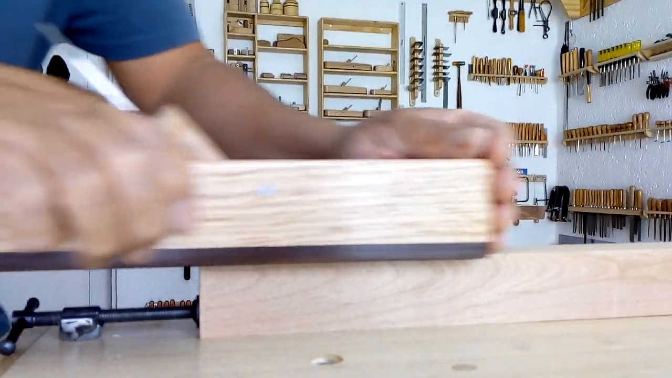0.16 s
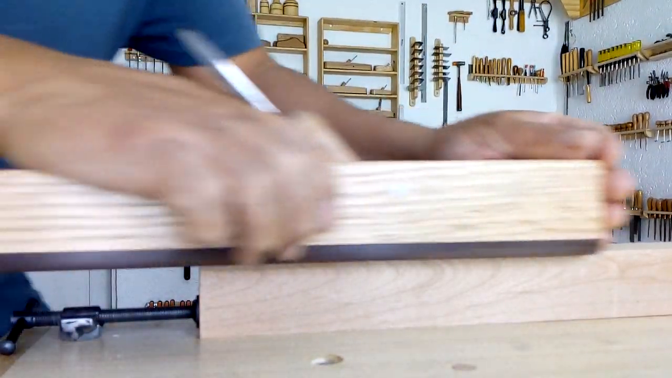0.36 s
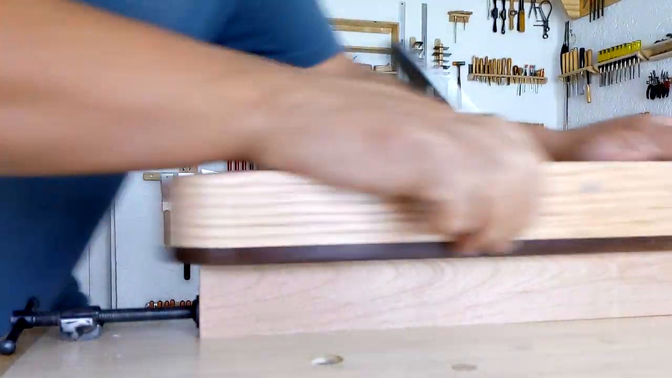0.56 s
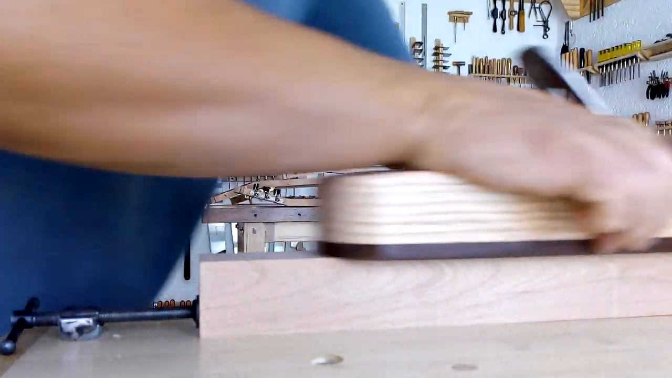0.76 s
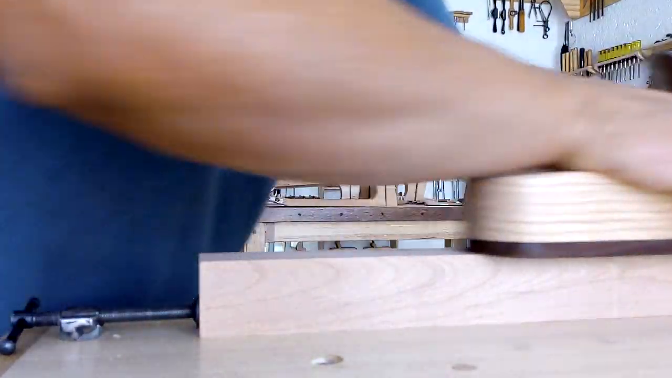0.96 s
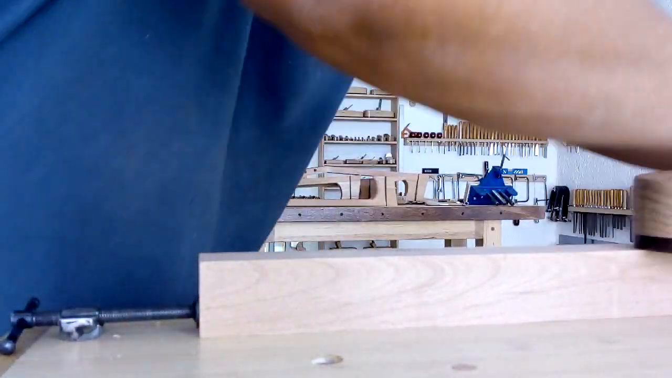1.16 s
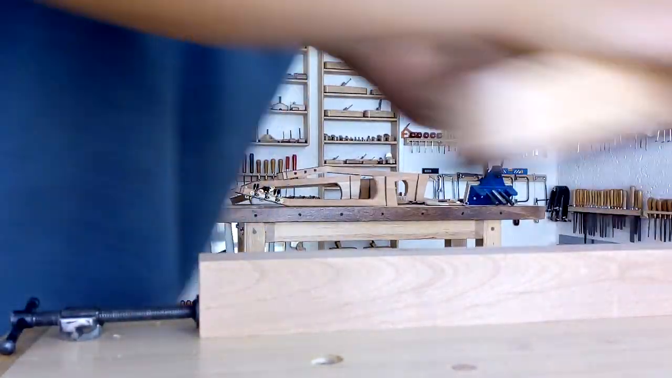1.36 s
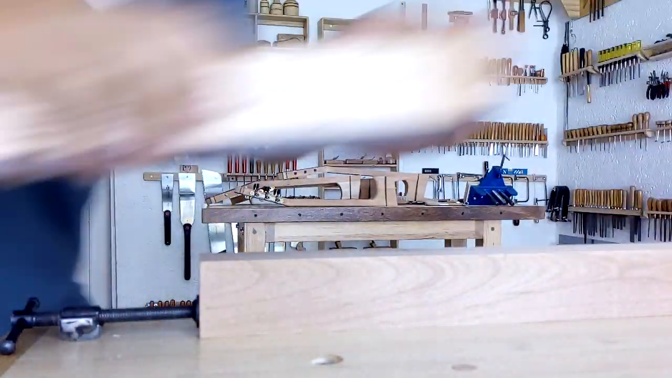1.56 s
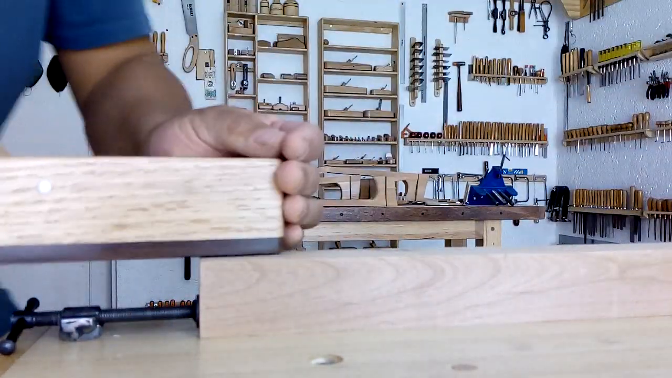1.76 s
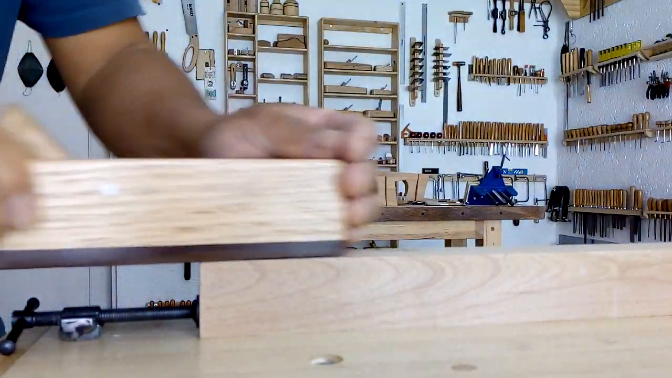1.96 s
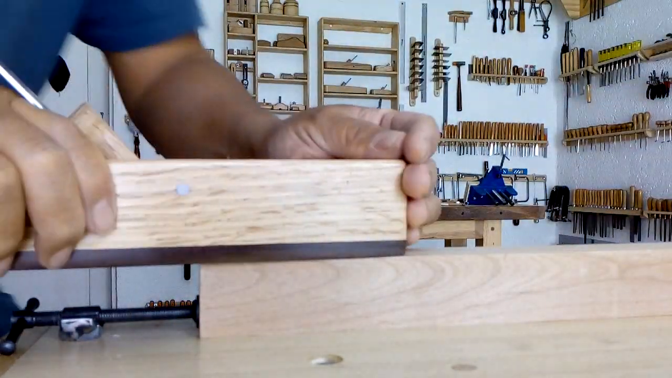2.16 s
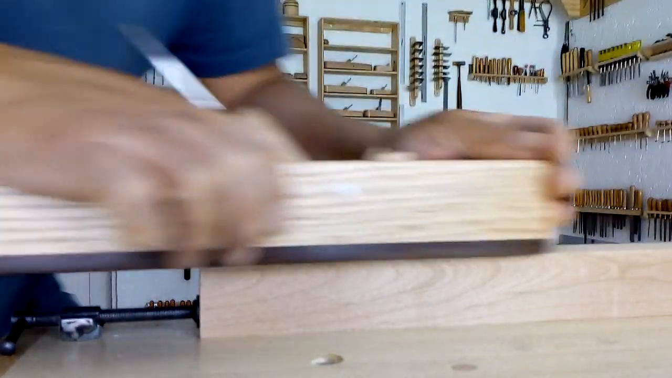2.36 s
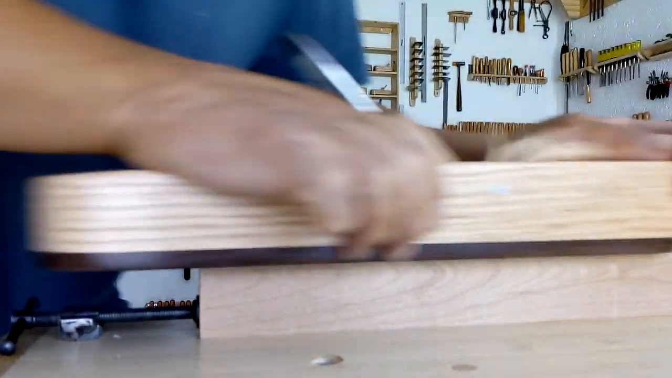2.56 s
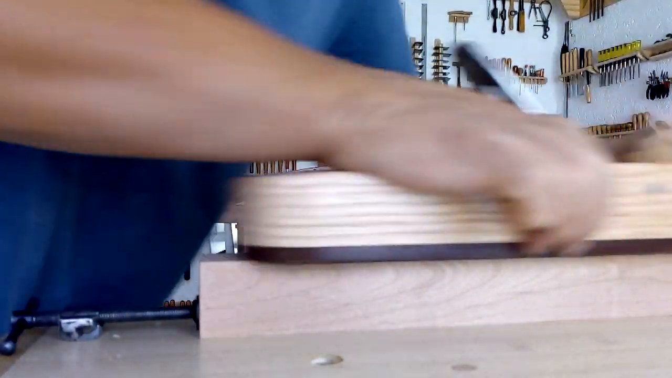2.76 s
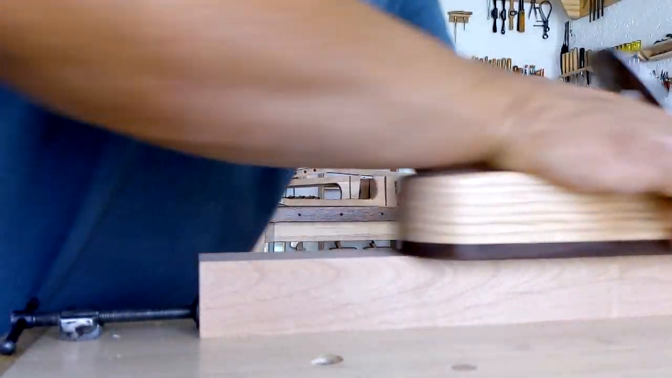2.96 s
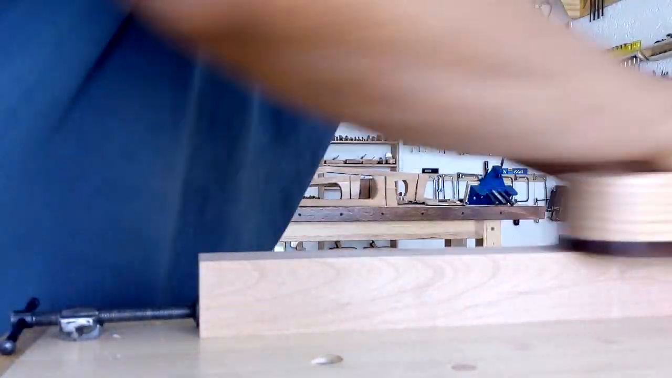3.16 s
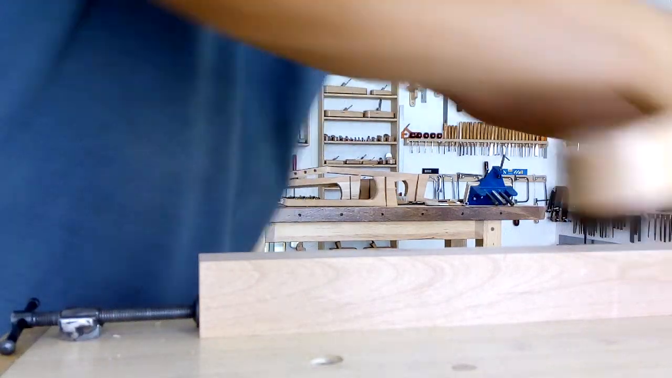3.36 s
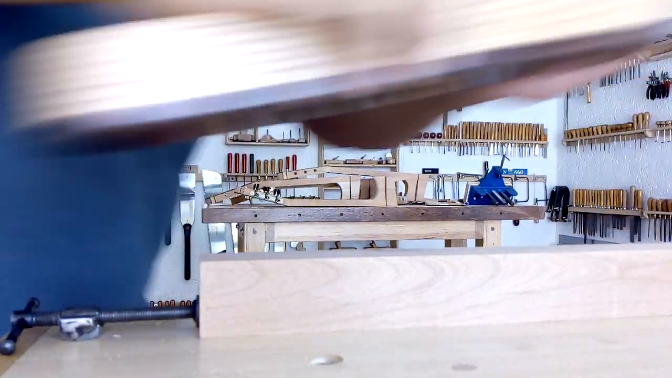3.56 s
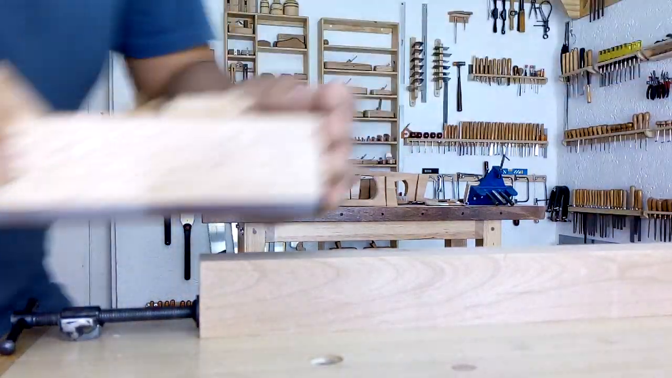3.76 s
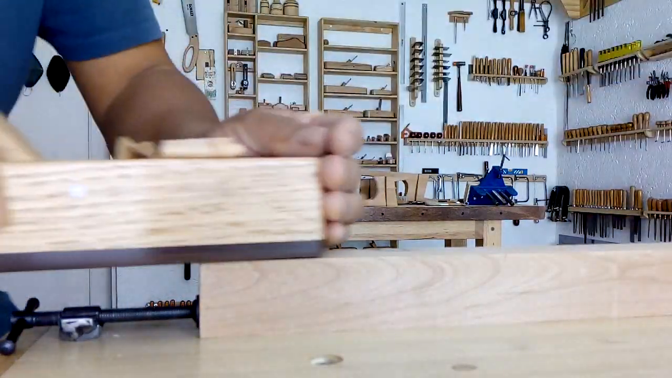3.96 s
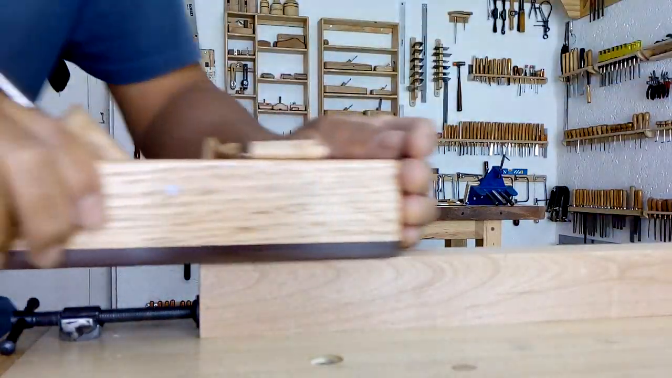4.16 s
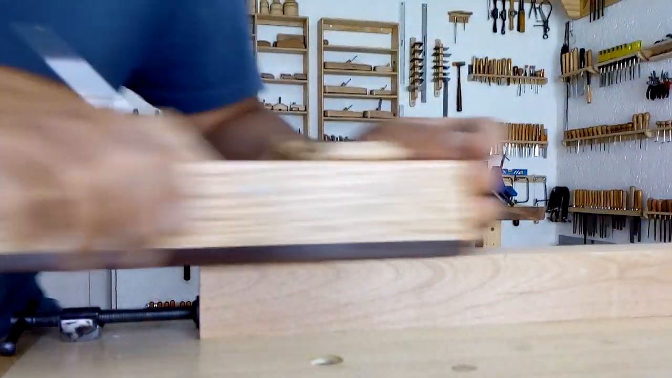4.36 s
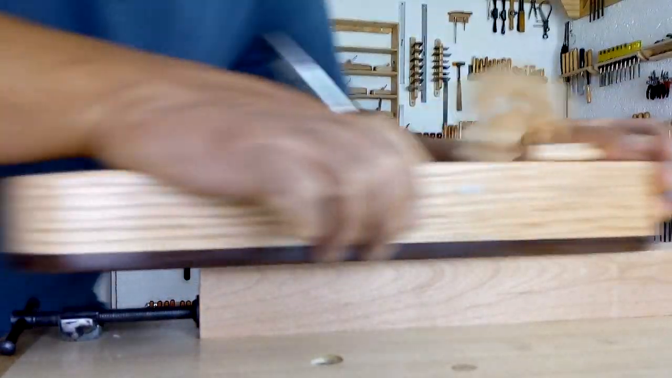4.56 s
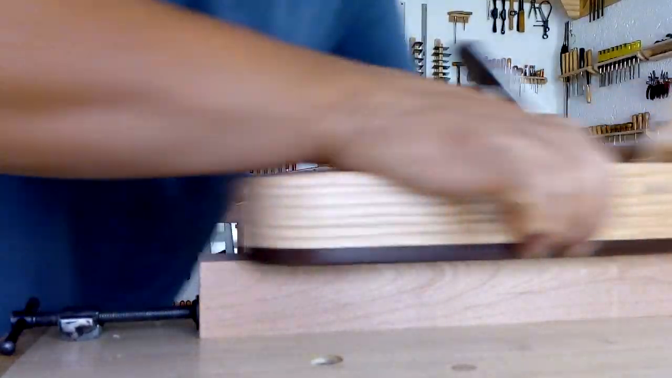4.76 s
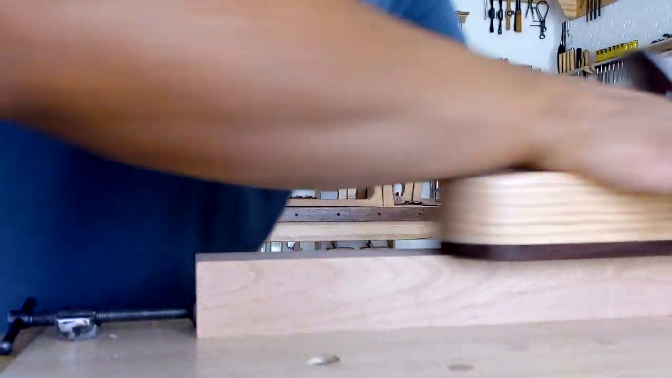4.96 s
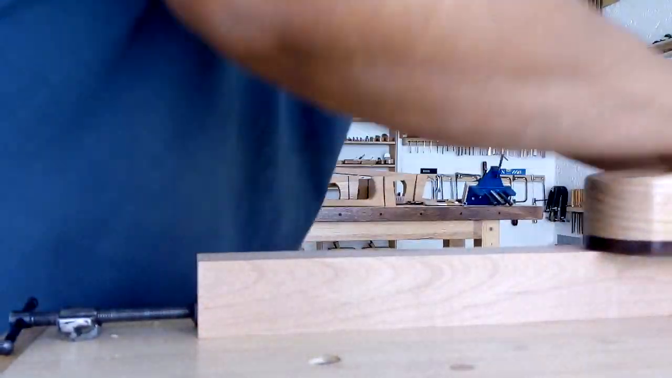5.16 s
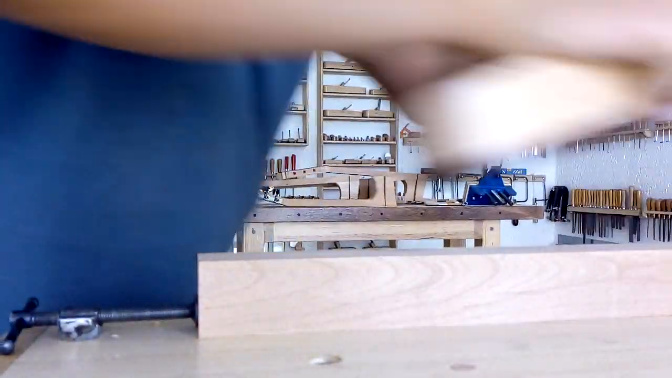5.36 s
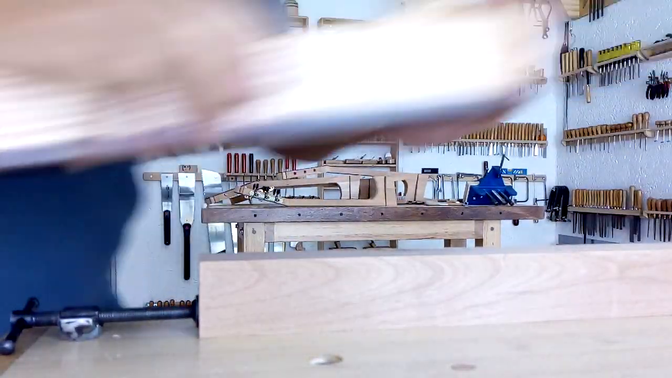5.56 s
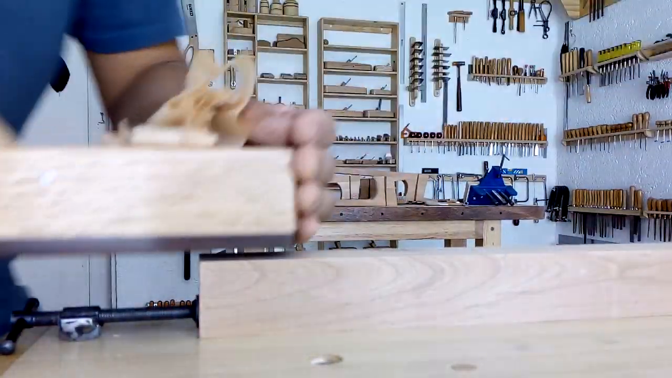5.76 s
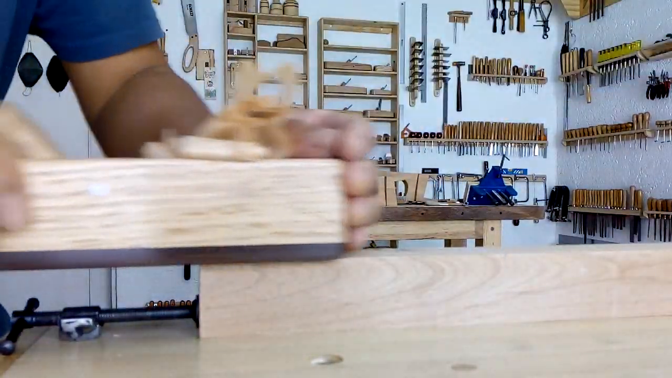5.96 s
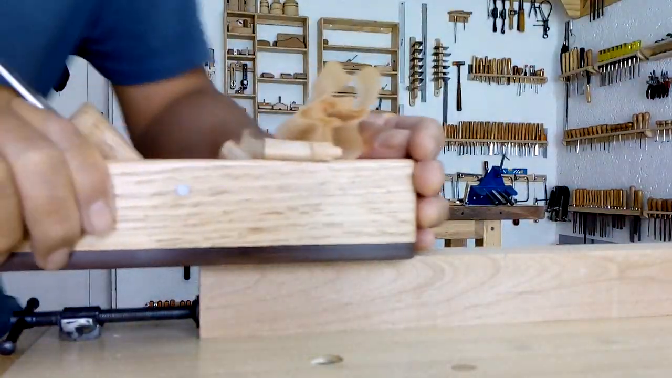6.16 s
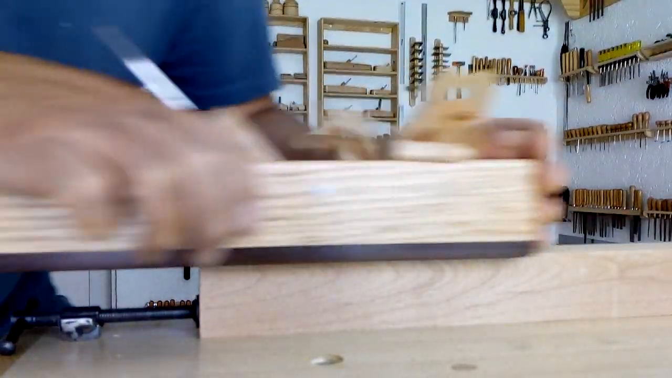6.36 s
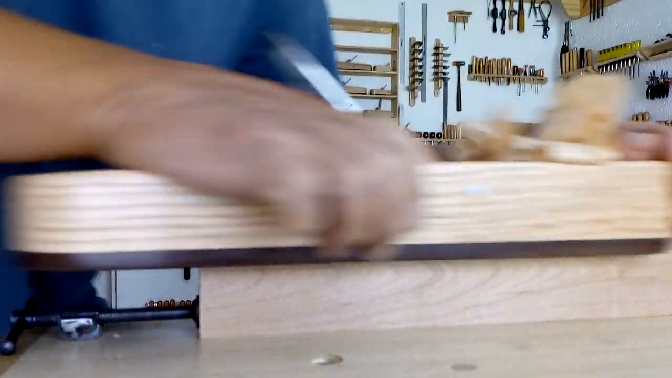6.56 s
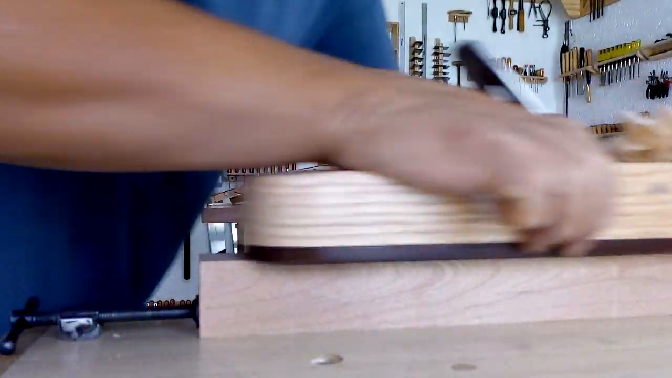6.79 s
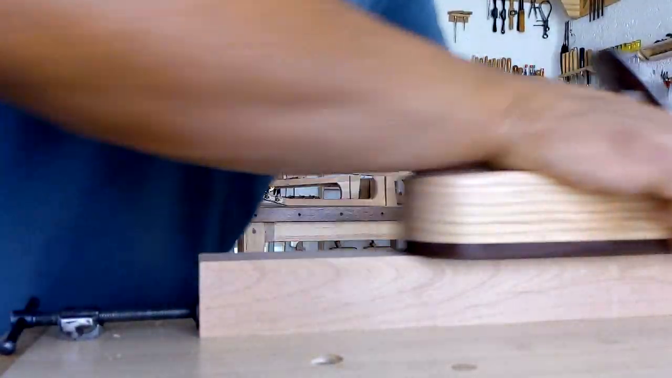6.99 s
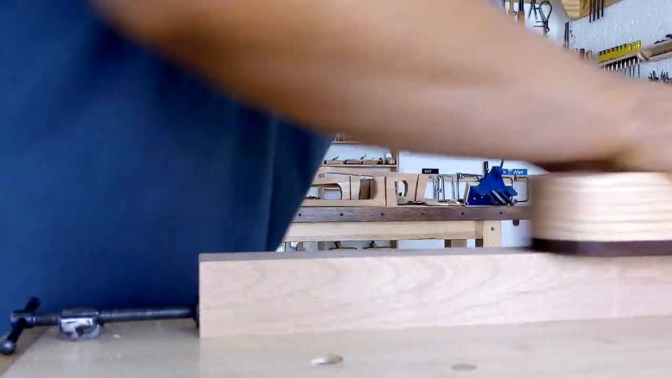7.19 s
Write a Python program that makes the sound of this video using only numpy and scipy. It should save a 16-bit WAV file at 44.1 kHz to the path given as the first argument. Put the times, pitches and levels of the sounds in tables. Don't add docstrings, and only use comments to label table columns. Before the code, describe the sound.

Four crisp scrapes of a hand plane cutting wood, with short quiet gaps, woody clunks and light sliding as the tool lands again.

```python
import sys
import numpy as np
from scipy import signal
from scipy.fft import rfft, irfft, next_fast_len
from scipy.io import wavfile
from scipy.ndimage import uniform_filter1d

SR = 44100
rng = np.random.default_rng(int(sys.argv[2]) if len(sys.argv) > 2 else 0)


def field_ratio(decibels):
    return 10 ** (np.asarray(decibels, dtype=float) / 20)


def to_wav(s):
    ch = np.atleast_2d(s).T
    pcm = np.round(np.clip(ch, -1, 1) * 32767)
    wavfile.write(sys.argv[1], SR, pcm.astype(np.int16))


N = 318843
T = np.arange(N) / SR


def evened(x):
    return x / np.sqrt(np.mean(x ** 2) + 1e-20)


def read(points, hz):
    f, value = np.transpose(points)
    return np.interp(np.log(hz + 1), np.log(f + 1), value)


def resonate(x, hz, width_hz):
    return signal.lfilter(*signal.iirpeak(hz, hz / width_hz, SR), x)


def tent_db(t, start_s, end_s, rise_db_per_s, fade_db_per_s):
    before = np.maximum(start_s - t, 0)
    after = np.maximum(t - end_s, 0)
    return -np.abs(rise_db_per_s) * before - np.abs(fade_db_per_s) * after


def snaps(per_s, spread_db):
    size = field_ratio(spread_db * np.minimum(rng.exponential(1, N), 4)) * rng.standard_normal(N)
    return evened(size * (rng.random(N) < per_s / SR))


def pair(z, other, hz, likeness):
    same = np.clip(read(likeness, hz), 0, 1)[:, None]
    return np.array([z, same * z + np.sqrt(1 - same ** 2) * other])


# time_s, level_db
ENGINE_SWELL = [
    (0, -52),
    (.2, -53),
    (.3, -60),
    (1.05, -60),
    (1.17, -54),
    (1.43, -50.5),
    (1.56, -53),
    (1.66, -64),
    (2.0, -62),
    (2.4, -66),
]
# multiple, level_db
FIRING_ORDERS = [(2, -10), (3, 0), (4, -11), (5, -13), (6, -7), (7, -16)]


def engine():
    turn_hz = 50.3
    time_s, level_db = np.transpose(ENGINE_SWELL)
    waver = evened(uniform_filter1d(rng.standard_normal(N), 9000))
    turns = np.cumsum(turn_hz * (1 + 0.016 * waver)) / SR
    hum = sum(field_ratio(db) * np.sin(2 * np.pi * (k * turns + rng.random())) for k, db in FIRING_ORDERS)
    gone_db = 120 * np.maximum(T - time_s[-1], 0)
    return evened(hum) * field_ratio(np.interp(T, time_s, level_db) - gone_db)


# time_s, change_db
AIR_DRIFT = [
    (1.4, -4.5),
    (3.4, 3.5),
    (3.9, 0),
    (5.3, -5),
    (5.5, -1),
    (6.1, 0),
]
# pitch_hz, level_db per Hz
AIR_COLOUR = [(20, -33), (40, -12), (70, -7), (140, -22.5), (230, -14), (350, -16.5), (550, -21.5),
              (1100, -26.5), (1400, -29), (2200, -26), (3500, -36), (8000, -43), (11500, -56.5),
              (15000, -49)]
# pitch_hz, likeness 0-1
DIFFUSE_LIKENESS = [(60, 1), (200, 0.72), (400, 0.9), (800, 0.35), (1500, 0.02), (15000, 0.2)]


def air():
    level_db = -61.5
    hz, t, z = signal.stft(rng.standard_normal((2, N)), SR, nperseg=2048, noverlap=1536)
    patches = uniform_filter1d(rng.standard_normal(z[0].shape), 12, 0)
    patch_db = 1.4 * evened(uniform_filter1d(patches, 8, 1))
    drift_db = np.outer(hz / (hz + 500), np.interp(t, *np.transpose(AIR_DRIFT)))
    colour = field_ratio(read(AIR_COLOUR, hz)[:, None] + patch_db + drift_db)
    x = signal.istft(pair(*z, hz, DIFFUSE_LIKENESS) * colour, SR, nperseg=2048, noverlap=1536)[1]
    return evened(x[:, :N]) * field_ratio(level_db)


# pitch_hz, t60_s
SHOP_DECAY = [(100, 0.26), (300, 0.64), (1000, 0.51), (1750, 0.5), (2100, 0.39), (2350, 0.57), (2700, 0.4),
              (4000, 0.4), (8000, 0.29), (15000, 0.34)]


def shop(x):
    taps = np.zeros((2, SR))
    at = np.arange(200, SR - 20, 20) + rng.integers(0, 20, (2, (SR - 201) // 20))
    np.put_along_axis(taps, at, rng.choice([-1., 1.], at.shape), 1)
    hz, t, z = signal.stft(taps, SR, nperseg=512)
    decay = field_ratio(-60 * t / read(SHOP_DECAY, hz)[:, None])
    tail = signal.istft(pair(*z, hz, DIFFUSE_LIKENESS) * decay, SR, nperseg=512)[1]
    tail[:, :180] = 0
    return signal.fftconvolve(x[None], tail / np.linalg.norm(tail[0]), axes=1)[:, :N]


# pitch_hz, level_db, t60_s
BENCH_MODES = [(160, 9, 0.67), (242.4, 1.5, 0.057), (272, -7, 0.34), (333.4, 4, 0.21), (389, 5.5, 0.18)]
# start_s, level_db, deep_share_db
BENCH_LURCHES = [(.056, -40, -6), (1.069, -50, -17), (2.548, -45.5, -1.5), (3.24, -55, -3),
                 (4.3, -55.5, 4.5), (4.57, -52.5, 11), (4.79, -57.5, 6.5), (5.128, -49, -3),
                 (6.25, -52.5, 4), (6.63, -59, 8.5), (6.89, -47.5, -23), (7.23, -42, -23)]
# start_s, level_db
SWAY_NUDGES = [(0, -65.5), (1.31, -55), (1.81, -61.5), (2.2, -65), (2.68, -63), (3.36, -58), (4.1, -56),
               (4.35, -42.5), (4.62, -48.5), (5.11, -53.5), (5.98, -48), (6.3, -53), (6.7, -59), (5.6, -69),
               (7.05, -57)]


def bench():
    push_db, push_deep_db = -55, -26
    lurch_slopes = 169.5, 129
    moves = [(bite, lift, push_db, push_deep_db) for bite, lift, *_ in STROKES]
    moves += [(s, s, db, deep_db) for s, db, deep_db in BENCH_LURCHES]
    upper = sum(field_ratio(db + tent_db(T, a, b, *lurch_slopes)) for a, b, db, _ in moves)
    deep = sum(field_ratio(db + deep_db + tent_db(T, a, b, *lurch_slopes)) for a, b, db, deep_db in moves)
    shake = snaps(600, 3.5)
    ring = 0
    for hz, db, t60 in BENCH_MODES:
        push = shake * (deep if hz < 190 else upper)
        ring = ring + field_ratio(db) * resonate(push, hz, 2.0 / t60 + 4) * np.sqrt(SR / (2.5 / t60 + 4))

    sway_hz, still_db = 104.5, -64.5
    nudge_slopes = 87, 65
    unrest = evened(resonate(rng.standard_normal(N), sway_hz, 9.0))
    sway = evened(np.sin(2 * np.pi * sway_hz * T) + .25 * unrest)
    swing = field_ratio(still_db) + sum(field_ratio(db + tent_db(T, s, s, *nudge_slopes)) for s, db in SWAY_NUDGES)
    return field_ratio(-11.5) * ring + sway * swing


# start_s, upper_bench_db, then shares deep_bench_db, board_db, tick_db
TOE_GRAZES = [
    (1.787, -53, -14, 16, -15),
    (3.948, -42, 16, 8.6, -20),
    (5.847, -32.5, -9, 5.3, -22),
]
# start_s, upper_bench_db, then shares deep_bench_db, board_db, tick_db
LANDINGS = [(1.049, -34.5, 9.5, 4, -10), (1.7965, -13, -18, -1, -18.5), (1.8165, -37.5, -2, 15, -7.5),
            (2.139, -57, -6, 21, 15), (3.956, -16.5, 6, 0.5, -24), (3.969, -40.5, -6, -9, -13.5),
            (4.228, -26.5, -2, 4.5, -3), (4.531, -33, -21, -21, 8), (5.108, -54, 21, -10.5, -1),
            (5.851, -14.5, 0, -2.5, -24.5), (6.148, -54, -5, 9, -8), (6.167, -26, -4, 11, 5.5)]
# start_s, upper_bench_db, then shares deep_bench_db, board_db, tick_db
REBOUNDS = [
    (1.8085, -23.5, -17.5, -4.5, -5.5),
    (1.891, -34.5, 3, -3.5, -6),
    (4.083, -23.5, -9, -27, -16),
    (6.002, -24, -29.5, -23, -43),
]
# pitch_hz, level_db, t60_s
WOOD_MODES = [(163, -22, 0.76), (239.7, 2.5, 0.21), (279.8, 6, 0.12), (340.3, 7.5, 0.098),
              (409, -12.5, 0.32), (534, -2.5, 0.076), (644, -10, 0.24), (755, -6.5, 0.16), (876, 3, 0.012),
              (910, -3, 0.012), (939, -3, 0.075), (1063, -5.5, 0.027), (1192, -4.5, 0.021),
              (1232, -5, 0.017), (1554, -7, 0.022)]
# pitch_hz, level_db, t60_s
BLADE_TICK = [(1650, 6.5, 0.028), (1900, 6.5, .02), (2400, -0.5, 0.028), (3640, -10, 0.012),
              (4570, -17.5, 0.05), (6200, -16, .008)]


def knocks(rows, ring, loss_s, crack_db):
    out, t = np.zeros(N + SR), np.arange(SR // 2) / SR
    clack = signal.butter(3, [1400, 2500], "bandpass", fs=SR, output="sos")
    detunes = rng.uniform(-1.82, 1, (len(rows), len(WOOD_MODES)))
    for (s, db, deep_db, board_db, tick_db), detune in zip(rows, detunes):
        grit = rng.standard_normal(len(t))
        crack = signal.sosfilt(clack, grit) * (.75 * np.exp(-t / .005) + .25 * np.exp(-t / .035))
        first_contact = resonate(resonate(grit, 5000, 8000), 5000, 8000)
        crack += .1 * first_contact * np.exp(-t / .002)
        for hz, mode_db, t60 in BLADE_TICK:
            crack += field_ratio(mode_db - 11.0 - 60 * t / t60) * np.sin(2 * np.pi * hz * t)
        blow = field_ratio(tick_db + crack_db) * crack * -np.expm1(-t / 0.0011)
        for (hz, mode_db, t60), shift in zip(WOOD_MODES, detune):
            part = np.searchsorted([255, 430], hz)
            share_db = (deep_db, 0, board_db)[part]
            fall = (1 - ring) * np.exp(-t / loss_s) + ring * field_ratio(-60 * t / t60)
            rise = 1 - np.exp(-(t / 0.0041) ** 2)
            pitch_hz = hz * (1 + 0.024 * shift * (part > 1))
            blow += field_ratio(share_db + mode_db - 1.5) * fall * rise * np.sin(2 * np.pi * pitch_hz * t)
        out[round(s * SR):][:len(t)] += field_ratio(db) * blow
    return out[:N]


# start_s, end_s, level_db
LIGHT_SLIDES = [
    (1.814, 1.82, -66),
    (1.9, 2.144, -57),
    (4.05, 4.211, -74),
    (5.962, 6.068, -70),
    (6.127, 6.16, -73),
]
# pitch_hz, width_hz, level_db
SOLE_MODES = [(2400, 130, -3), (3580, 130, -5), (4840, 110, -6), (5850, 180, -3)]


def slides():
    rub = signal.sosfilt(signal.butter(4, 6800, fs=SR, output="sos"), snaps(5000, 3.0))
    sole = 0
    for hz, width, db in SOLE_MODES:
        grip_db = 5.5 * evened(uniform_filter1d(rng.standard_normal(N), 1500))
        ringing = resonate(resonate(rub, hz, 2 * width), hz, 2 * width)
        sole = sole + field_ratio(db + grip_db) * evened(ringing)
    wide = .75 * evened(resonate(rub, 4000, 5000))
    slopes = 508, 541
    level = sum(field_ratio(db + tent_db(T, a, b, *slopes)) for a, b, db in LIGHT_SLIDES)
    return evened(evened(sole) + wide) * level


# start_s, level_db
SOLE_SCUFFS = [
    (1.799, -58),
    (2.141, -48.5),
    (3.958, -58),
    (4.233, -47),
    (4.512, -34),
    (4.545, -38),
    (4.575, -40),
    (5.854, -62),
    (6.171, -46),
]


def scuffs():
    half_length_s = 0.0023
    grit = rng.standard_normal(N)
    colour = 0
    for hz, width_hz, db in [(7800, 2300, 1), (15300, 2500, -17), (4530, 3000, 0.5)]:
        colour = colour + field_ratio(db) * resonate(resonate(grit, hz, width_hz), hz, width_hz)
    puffs = sum(field_ratio(db) * np.exp(-((T - s) / half_length_s) ** 2) for s, db in SOLE_SCUFFS)
    return evened(colour) * puffs


# time_s, cut_depth_db, mouth_pitch_hz, speed_db
HAND_MOVES = [
    [(0, -65, 2250, -72), (.076, -36, 2170, -50), (.17, -29.5, 2210, -44.5), (.4, -34.5, 2300, -37.5),
     (.5, -46, 2150, -45.5), (.68, -42.5, 2400, -42), (.83, -32, 2510, -36), (1.05, -30.5, 2090, -36.5)],
    [(2.235, -43, 2060, -54), (2.28, -22.5, 2200, -33.5), (2.42, -37, 2730, -33.5), (2.564, -30, 2400, -44),
     (2.7, -30.5, 2500, -36), (2.89, -29, 2600, -38.5), (3.03, -27.5, 1980, -40), (3.146, -31, 2120, -37.5)],
    [(4.349, -33, 2250, -43), (4.375, -29, 2250, -37), (4.4, -24, 2230, -34), (4.425, -36, 2300, -33),
     (4.47, -40, 2350, -31.5), (4.52, -34.5, 2370, -33), (4.735, -34, 2660, -33), (4.95, -34, 2680, -36),
     (5.083, -33, 2070, -33.5)],
    [(6.285, -28.5, 2230, -41.5), (6.351, -30.5, 2260, -37), (6.5, -28.5, 2240, -38),
     (6.74, -32, 2620, -35.5), (6.81, -25, 2600, -35), (7.025, -27.5, 2530, -39), (7.17, -34.5, 2140, -40)],
]


def hands(t, column):
    rows = np.concatenate(HAND_MOVES)
    return np.interp(t, rows[:, 0], rows[:, column])


# start_s, level_db, fade_db_per_s
SOLE_CATCHES = [
    (.05, -41.5, 83),
    (0.441, -43.5, 86),
    (2.25, -41.5, 252.5),
    (2.5, -54.5, 98.5),
    (4.236, -38.5, 257),
    (4.334, -40.5, 404),
    (4.528, -38, 127),
    (6.174, -37, 122),
]


def catching(t):
    hold_s, rise_db_per_s = 0.011, 889
    return sum(field_ratio(db + tent_db(t, s, s + hold_s, rise_db_per_s, fade)) for s, db, fade in SOLE_CATCHES)


# bite_s, lift_s, hiss_db, board_rumble_db
STROKES = [
    (0.0, 1.058, -44, -48),
    (2.244, 3.115, -44.5, -48),
    (4.349, 5.057, -46, -47.5),
    (6.265, 7.18, -47, -48.5),
]
BITE_SLOPES = [890, 1270, 1190, 1113]
LIFT_SLOPES = [200, 283, 400, 500]


def parts(t):
    hiss_per_speed, board_per_depth, usual_db = 0.66, 0.2, -38
    depth_db, speed_db = hands(t, column=1), hands(t, column=3)
    catch_share_db = np.array([-2, -16, -30, -40])
    out = np.outer(field_ratio(catch_share_db), catching(t))
    for bite_s, lift_s, hiss_db, board_db in STROKES:
        board = board_db + board_per_depth * (depth_db - usual_db)
        hiss = hiss_db + hiss_per_speed * (speed_db - usual_db)
        levels_db = [board, depth_db, speed_db, hiss]
        out += [field_ratio(db + tent_db(t, bite_s, lift_s, up, down))
                for db, up, down in zip(levels_db, BITE_SLOPES, LIFT_SLOPES)]
    return out + 1e-9


# pitch_hz, level_db per Hz
CUT_COLOUR = [(300, -22), (500, -19), (750, -17), (1290, -10), (1900, -4), (2600, -5), (3300, -8.5),
              (4850, -16), (6300, -18.5), (8500, -16.5), (10000, -26), (12000, -34), (13800, -26.5),
              (15200, -24)]
# pitch_hz, width_hz, lift_db
BODY_MODES = [(572, 79, 7.5), (722, 32, 9), (875, 67, 9), (1332, 5.2, 3.5), (2207, 25, 1.5),
              (2090, 12.4, 1.5), (2362, 73, -3), (2600, 280, 2), (2920, 58, 2.5), (3590, 50, 2.5),
              (4500, 53, 3), (4980, 160, 0), (6150, 560, 4)]
# start_s, length_s, first_hz, last_hz, lift_db
SINGING_CURLS = [(0.22, 0.22, 3500, 4400, 6), (0.76, 0.24, 4150, 4600, 8), (0.01, .14, 350, 1300, 10),
                 (6.3, .33, 4900, 5600, -8), (4.4, .2, 6200, 6600, 5), (2.278, 0.19, 3900, 4300, 5),
                 (4.4, .16, 3900, 4300, 7), (4.33, .1, 3500, 3700, 8), (4.4, .12, 3000, 3900, 6),
                 (2.27, .2, 3300, 3500, 5), (4.68, 0.34, 3760, 3060, 7), (6.713, 0.26, 3680, 3560, 12.5),
                 (2.66, 0.3, 5300, 5500, 5), (2.27, 0.26, 5900, 6500, 5)]
# start_s, end_s, upper_mode_lift_db, lower_mode_lift_db
TOE_LEANS = [(0.05, 0.235, 17, 14.5), (0.362, 0.678, 7, 3.5), (0.983, 1.1, 3.5, 9), (2.22, 2.27, 19, 3),
             (2.435, 2.56, 10.5, -2), (2.633, 2.85, 6.5, -1.5), (4.217, 4.345, 21, 0),
             (4.542, 4.604, 11, -1), (5.033, 5.1, 5, 5), (6.17, 6.254, 14, 0), (6.292, 6.545, 14, 0),
             (7.162, 7.23, 14, 16.5)]
# pitch_hz, likeness 0-1
BODY_LIKENESS = [(300, 0.88), (1000, 0.68), (3000, 0.66), (6000, 0.33), (12000, 0)]


def shaving():
    hz, t, z = signal.stft([snaps(9000, 1.52), snaps(9000, 0.5)], SR, nperseg=1024, noverlap=768)
    f = hz[:, None]

    bite = np.clip((hands(t, column=1) + 50) / 18, .2, 1.3)
    mouth = np.exp(-((f - hands(t, column=2)) / 300) ** 2)
    colour_db = read(CUT_COLOUR, f) + 11.0 * bite * mouth

    for start_s, length_s, first_hz, last_hz, db in SINGING_CURLS:
        u = np.clip((t - start_s) / length_s, 0, 1)
        swell = np.sqrt(np.abs(np.sin(np.pi * u)))
        curl_hz = first_hz + (last_hz - first_hz) * u
        colour_db += db * swell * np.exp(-((f - curl_hz) / 200) ** 2)

    thinning = sum(np.exp(-((t - lift_s) / 0.31) ** 2) for _, lift_s, *_ in STROKES)
    colour_db += 9.1 * thinning * np.exp(-((f - 5140) / 2000) ** 2)

    toe_modes, ease_s = [(1698, 114), (1395, 78)], 0.028  # (Hz, width Hz)
    for start_s, end_s, *lifts_db in TOE_LEANS:
        lean = np.exp(-((t - np.clip(t, start_s, end_s)) / ease_s) ** 2)
        for db, (toe_hz, width_hz) in zip(lifts_db, toe_modes):
            colour_db += db * lean * np.exp(-((f - toe_hz) / width_hz) ** 2)

    for centre_hz, width_hz, db in BODY_MODES:
        waver = 1 + .5 * evened(uniform_filter1d(rng.standard_normal(len(t)), 14))
        colour_db += db * bite * waver / (1 + ((f - centre_hz) / width_hz) ** 2)

    grain = uniform_filter1d(rng.standard_normal(z[0].shape), 6, 0)
    colour_db += 1.8 * evened(uniform_filter1d(grain, 12, 1))

    gain, share_db = field_ratio(colour_db), np.zeros(colour_db.shape)
    level = parts(t)
    for lo, hi, part in zip([0, 1300, 3200, 7000], [1300, 3200, 7000, SR], level / level.sum(0)):
        band = (hz >= lo) & (hz < hi)
        power = (gain[band] ** 2).sum(0) / len(hz)
        share_db[band] = 20 * np.log10(part) - 10 * np.log10(power)
    gain *= field_ratio(uniform_filter1d(share_db, size=19, axis=0))
    x = signal.istft(pair(*z, hz, BODY_LIKENESS) * gain, SR, nperseg=1024, noverlap=768)[1][:, :N]

    judder_db = 1.7 * evened(uniform_filter1d(rng.standard_normal(N), 500))
    return x * uniform_filter1d(parts(T).sum(0) * field_ratio(judder_db + 0.5), 300)


def scene():
    blows = knocks(LANDINGS + TOE_GRAZES, ring=0.43, loss_s=0.0054, crack_db=8.0)
    rebounds = field_ratio(9) * knocks(REBOUNDS, ring=.06, loss_s=.004, crack_db=-8)
    cut, light = shaving(), slides() + scuffs()
    direct = field_ratio(1.5) * (cut + light) + blows + rebounds + bench() + engine()

    to_walls = field_ratio(-6) * cut[0] + field_ratio(-12) * light
    free = sum(np.exp(-((T - lift_s) / .12) ** 2) for _, lift_s, *_ in STROKES)
    to_walls += field_ratio(5) * resonate(to_walls * free, 2150, 320)
    thin_blows = blows - 0.5 * resonate(blows, 298, 210)
    to_walls = to_walls + field_ratio(-6.5) * thin_blows + field_ratio(-10.0) * rebounds
    return field_ratio(-4.5) * direct + shop(to_walls) + air()


# pitch_hz, share 0-1
TREBLE_GAPS = [(4000, 0), (6000, .015), (8000, .1), (9300, .33), (11000, .42), (13500, .33), (14500, .06)]


def starve(x):
    hz, t, z = signal.stft(x, SR, nperseg=1024, noverlap=768)
    luck = rng.random((len(hz) // 6 + 1, len(t) // 7 + 1))
    luck = luck.repeat(6, 0).repeat(7, 1)[:len(hz), :len(t)]
    kept = luck > read(TREBLE_GAPS, hz)[:, None]
    return signal.istft(z * kept, SR, nperseg=1024, noverlap=768)[1][:, :N]


def band_limit(x):
    return signal.sosfilt(signal.butter(12, 16860, fs=SR, output="sos"), x)


# pitch_hz, left_minus_right_db
PORT_BALANCE = [(60, -7), (150, -7.5), (400, -7.5), (1000, -5.5), (2400, -5.5), (5000, -5.5), (9000, -5),
                (15000, -15)]
# pitch_hz, left_lead_rad
PORT_LEAD = [(100, 0), (1000, 1), (1700, -1), (2700, -2), (3500, -1.5), (5000, -2), (8000, -2.5),
             (15000, -10.5)]


def record(dry):
    bass_cut_hz, edge_hz = 25, 15600
    size = next_fast_len(N)
    hz = np.fft.rfftfreq(size, 1 / SR)
    tilt = field_ratio(read(PORT_BALANCE, hz) / 2) * np.exp(.5j * read(PORT_LEAD, hz))
    band = (hz < edge_hz) * hz ** 2 / (hz ** 2 + bass_cut_hz ** 2)
    x = irfft(rfft(dry, size) * np.array([tilt, 1 / tilt]) * band, size)[:, :N]
    mix = starve(x)
    return band_limit(mix)


dry = scene()
out = record(dry)
to_wav(out)
```